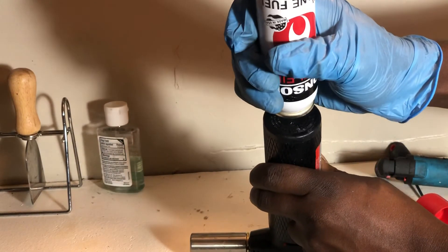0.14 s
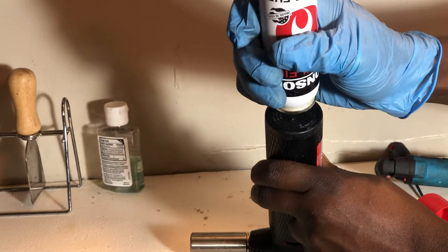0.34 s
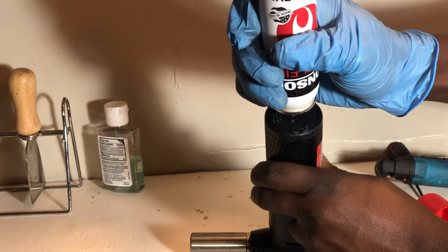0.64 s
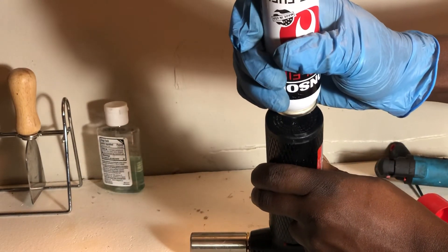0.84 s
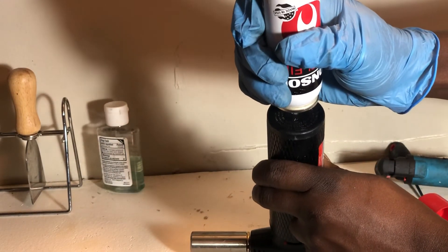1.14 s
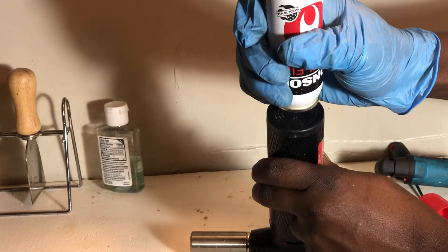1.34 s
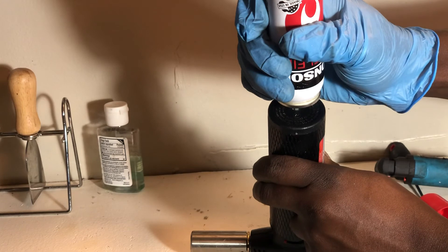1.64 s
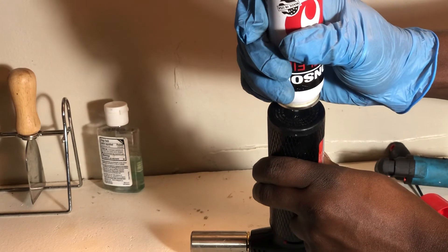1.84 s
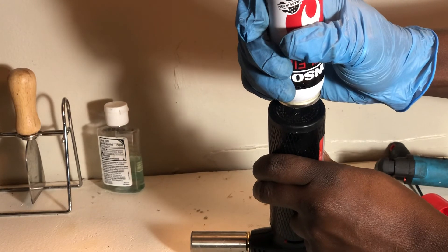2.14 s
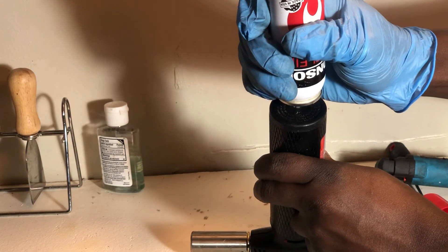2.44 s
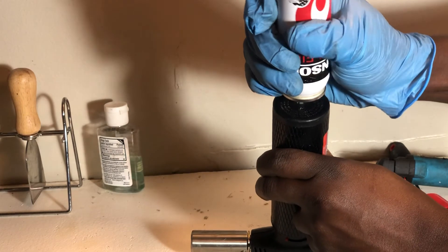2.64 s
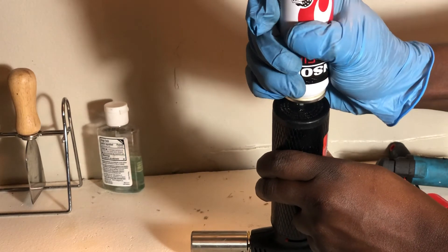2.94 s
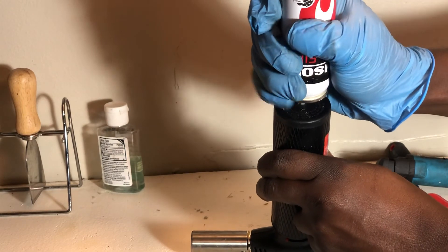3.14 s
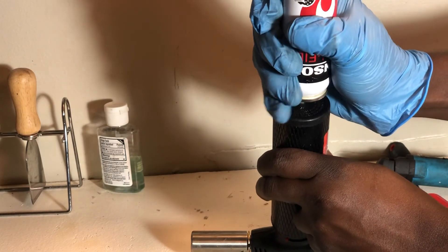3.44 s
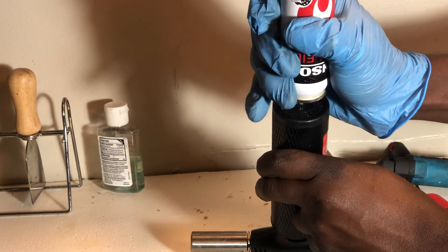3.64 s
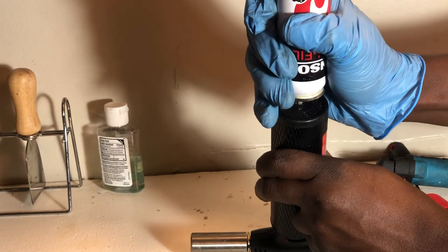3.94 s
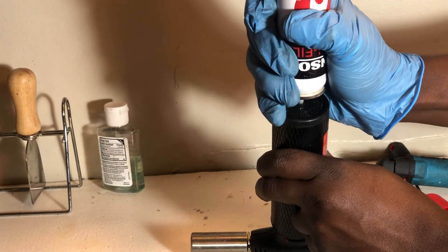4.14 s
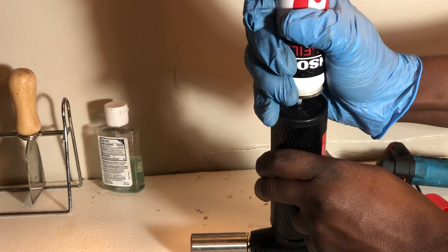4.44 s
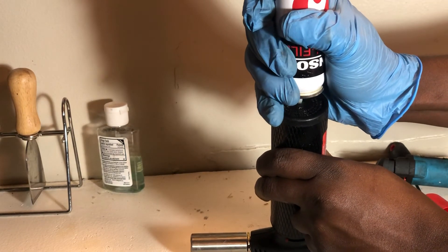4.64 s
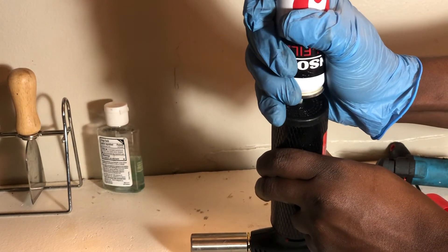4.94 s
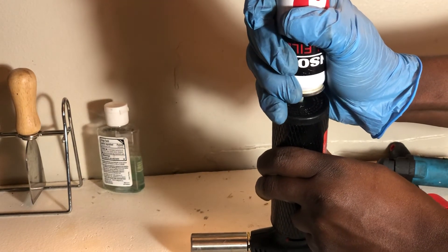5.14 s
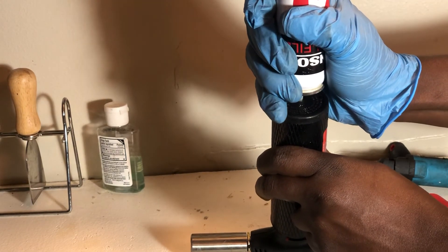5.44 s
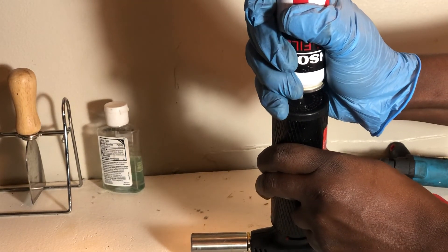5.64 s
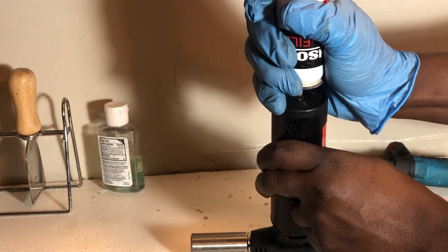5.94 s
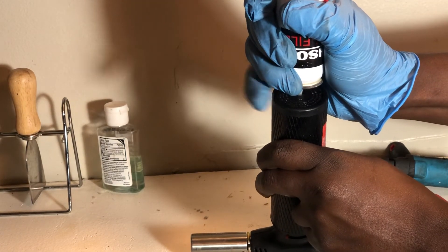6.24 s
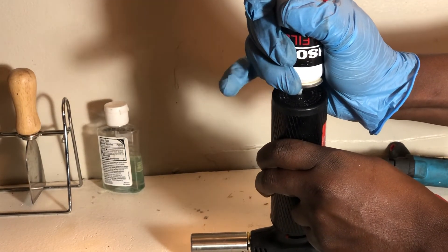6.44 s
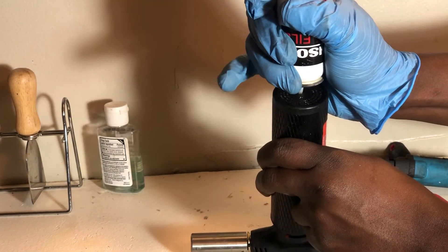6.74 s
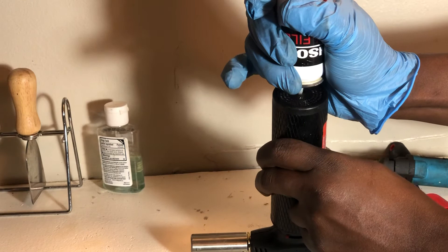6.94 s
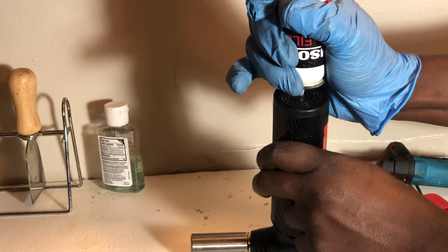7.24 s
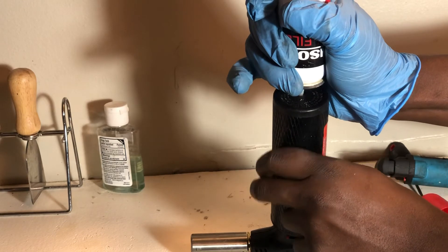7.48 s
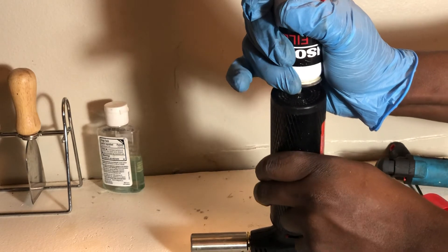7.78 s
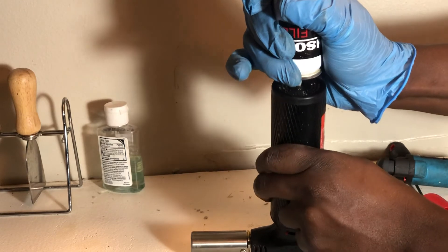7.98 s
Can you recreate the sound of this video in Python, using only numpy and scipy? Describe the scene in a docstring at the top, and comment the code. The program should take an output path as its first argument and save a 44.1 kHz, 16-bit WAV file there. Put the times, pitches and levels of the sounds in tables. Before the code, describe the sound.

A steady high-pitched gas hiss dominates, recorded near the hands with short reflections from bench and wall. It starts with quick liquid spurts and a small bump, becomes smooth and slightly stronger, then softens and shifts in colour as a finger covers the gap. Later it turns airier and uneven. Three tiny ticks occur, with quiet garage rumble and hum beneath, and soft low thuds near the end.

```python
"""In a garage, butane hisses from a can held nozzle-down on a torch's fill valve, over low room noise and hum.
First the leak, a fluttering noise jet, spurts liquid through the gap between can and torch; the valve recess
rings wet, then dries. The can rocks and leans, moving the gap's cut-on and the resonances that ride on it.
From about 3 s a gloved finger cups the joint, and a quieter hiss follows; after 6 s the finger eases partly off.
The nozzle ticks in its seat early, midway and late; hands bump the bench once early, then softly at the end."""
import sys
import numpy as np
from scipy import signal
from scipy.fft import rfft, irfft, next_fast_len
from scipy.io import wavfile
from scipy.ndimage import uniform_filter1d

SR = 44100
rng = np.random.default_rng(int(sys.argv[2]) if len(sys.argv) > 2 else 0)


def log_audio(samples):
    """Write samples as a 16-bit WAV file to the path given in sys.argv[1]."""
    # one column per channel
    frames = np.atleast_2d(samples).T
    # limit to full scale, then quantise
    limited = np.clip(frames, -1, 1)
    pcm = np.round(limited * 32767).astype(np.int16)
    wavfile.write(sys.argv[1], SR, pcm)


N = 357651

# The garage's noise spectrum. Each row: frequency in Hz, relative level in dB per Hz.
ROOM_SPECTRUM = [(20, -24), (35, -14), (56, 1.5), (75, -5.5), (105, 2.5), (135, -2), (175, -6), (240, -6),
                 (330, -7.5), (450, -9.5), (720, -9), (950, -5.5), (1400, -12), (3000, -23)]
# Narrow low resonances standing out of it. Each row: centre in Hz, width in Hz, level over the spectrum in dB.
ROOM_MODES = [(98.5, 6.9, -5.5), (131, 8, -2.5), (168, 12, 4.5), (285, 13, 0), (304, 11, -5), (525, 14, -1),
              (575, 7.9, 6), (939, 9.9, 3), (996, 5.5, 2)]
# Room level before the rumble swells; rumble top in Hz, and its resting gain in dB.
ROOM_DB, RUMBLE_TOP_HZ, RUMBLE_DB = -53, 330, -.3
# The grip shifts and the rumble swells. Each row: middle in seconds, length in seconds, gain in dB.
GRIP_SHIFTS = [(.08, 0.28, 4.5), (1.377, .2, 5), (4.176, 0.17, 4), (5.752, 0.57, 3), (6.9, 0.56, 2.5),
               (7.675, 0.29, 4), (8.06, 0.14, 9)]

# Lines of the low hum. Each row: centre in Hz, width in Hz, relative level in dB.
HUM_LINES = [(335.6, 6.1, -10.5), (358, 4.5, 1.5), (373.5, 3.2, -6.5)]
# The hum swells twice. Each row: middle in seconds, length in seconds, gain in dB.
HUM_SWELLS = [(2.45, 0.92, 6), (3.85, 0.57, 6)]
HUM_DB = -64  # between the swells

# Soft bumps of the hands on the bench. Each row: time in seconds, level in dB.
BUMPS = [(0.083, -39.5), (7.571, -48), (7.693, -49), (7.73, -49), (7.843, -41), (7.86, -41), (8.018, -36),
         (8.033, -45), (8.083, -41), (8.097, -42)]
# Low modes of the bench. Each row: frequency in Hz, level added to each bump in dB, 60 dB decay in seconds.
BENCH_MODES = [(61, 6.5, 0.05), (91, 2, 0.071), (139, -5.5, 0.17), (202, 1, 0.044), (294, -6.5, 0.043)]

# Echoes off torch, hands, bench and wall, some 0.5 to 1.7 m of extra path.
# Each row: delay in milliseconds, pressure gain.
ECHOES = [(1.565, .05), (1.995, -.08), (5.034, -.11)]

# The nozzle ticks in its seat. Each row: time in seconds, level in dB before the tick's filter.
TICKS = [(0.17, -36.5), (2.6202, -37), (7.243, -44)]

# Strength of the leak. Each row: time in seconds, hiss level in dB before the spurts.
FLOW = [(0, -35.5), (.6, -36), (1.24, -34), (1.48, -33), (1.72, -34.5), (2.7, -33.5), (3.16, -34),
        (3.48, -35), (4.09, -35.5), (4.3, -38), (4.7, -38), (5.15, -37.5), (6.1, -37.5), (6.38, -35),
        (6.85, -36), (7.05, -37.5), (7.4, -36.5), (7.9, -37), (8.04, -33.5)]
# Spurts of liquid in the jet.
# Each row: middle in seconds, length in seconds, gain in dB, dB added to the valve recess over twice that length.
SPURTS = [(.047, .018, 1.5, -1), (0.068, 0.013, 5, -2), (0.139, 0.041, 2.5, -1), (0.163, 0.052, 3, 0.5),
          (0.37, 0.0071, 3, 4.5), (0.412, 0.011, 7.5, -3), (0.604, 0.014, 5, 0.5), (0.68, 0.0082, 6.5, 5),
          (0.775, 0.011, 5, 2), (2.682, 0.064, 2.5, 0.5), (6.67, 0.079, 1.5, 0)]

# The gap passes treble only above its cut-on, which glides as the can rocks.
# Each row: time in seconds, cut-on in Hz.
CUT_ON = [(0, 7720), (.66, 7650), (.99, 7810), (2.07, 8010), (2.67, 7850), (2.96, 7800), (3.41, 7330),
          (3.6, 7580), (4.12, 7360), (4.73, 6780), (6.12, 6720), (6.39, 6950), (6.98, 7700), (7.34, 7020),
          (7.87, 6810), (7.96, 7370), (8.11, 7980)]
CUT_ON_STEEPNESS = 200  # exponent of the power slope below the cut-on
# Lean of the can off its seat, growing overall. Each row: time in seconds, lean from 0 to 1.
LEAN = [(0, 0.05), (2.26, 0.05), (3.33, 0.47), (6.15, 0.74), (6.86, 0.62), (7.13, 1), (8.11, 1)]
# A finger cups the joint. Each row: time in seconds, cover from 0 to 1.
FINGER = [(2.88, 0), (3.2, .49), (3.95, 0.55), (4.68, 0.85), (6.12, 0.73), (6.42, 0.37), (7.1, 0.24)]
# Resonances of the gap. Each row: multiple of the cut-on, width in Hz, level in dB, dB added at full lean,
# dB added at full finger cover, share of pitch gained at full lean, share of pitch gained at full cover.
GAP_RESONANCES = [(1.079, 655, -0.67, -4.5, .7, 0.018, 0.058), (1.24, 580, -4.9, 9.5, 4, 0.036, 0.081),
                  (1.53, 1890, -2, 0.9, -3, 0.015, 0), (2.04, 3070, -15, 9, -1.8, 0.03, .08)]
# Paths round the nozzle mostly add when the can is upright and cancel as it leans.
# Each row: multiple of the cut-on, width in Hz, dB when upright, dB at full lean.
INTERFERENCE = [(.56, 905, 3, -9), (.94, 450, -1.5, -3), (1.18, 520, 6.5, -3.5), (1.335, 600, 6, -11),
                (1.68, 600, 0, -0.5)]
# Airy whistles catch at the gap's edge and let go.
# Each row: start in seconds, end in seconds, centre in Hz, width in Hz, level in dB.
WHISTLES = [(-.2, 0.834, 15700, 250, -1), (2.56, 2.94, 12900, 950, -5), (2.59, 4.19, 10200, 700, -1),
            (3.47, 3.78, 12900, 1400, -16), (4.35, 5.85, 14110, 370, -4.5), (6.25, 6.773, 10980, 790, 1.5),
            (6.32, 6.76, 15070, 730, -7), (7.938, 8.3, 11800, 960, 2.5)]
# The treble band dulled by the finger, with its dB at full cover.
SHADE_HZ, SHADE_WIDTH_HZ, SHADE_DB = 13100, 1000, -3

# Rim and broad rush below the cut-on: level in dB, dB added at full lean, dB added at full finger cover.
RIM_DB = (-13, 1, -11.5)
RUSH_DB = (-24.5, 7, 3)
# Rim pitch as a multiple of the cut-on, share of pitch lost at full lean, width in Hz.
RIM_OVER_CUT_ON, RIM_SINK_SHARE, RIM_WIDTH_HZ = .81, 0.078, 980
# The valve recess rings louder and lower while liquid wets it; it dries over the last DRYING_S.
WET_UNTIL_S, DRYING_S = 0.92, 0.3
RECESS_DRY_HZ, RECESS_WET_HZ, RECESS_WIDTH_HZ = 3530, 3270, 780
RECESS_DB, RECESS_WET_DB, RECESS_LEAN_DB = -16.5, 5.5, -7  # dry level, added when wet, added at full lean
# Resonances of the hollow under the finger. Each row: centre in Hz, width in Hz, relative level in dB.
HOLLOW = [(1820, 150, -2), (2250, 210, -8), (4300, 370, -3.5), (4770, 210, -1.5)]
HOLLOW_DB, HOLLOW_CUPPED_DB = -22.5, 13  # when open, added at full cover
# Narrow resonances of can and valve. Each row: centre in Hz, width in Hz, relative level in dB.
METAL = [(2890, 90, 0), (3273, 220, -3), (3704, 100, 0), (3854, 80, -1), (5254, 180, -3), (8665, 100, 0),
         (8829, 90, -4), (9216, 80, -5), (9475, 150, -4), (9706, 70, -1), (9860, 120, -3), (10250, 150, -2),
         (10635, 70, 1), (10810, 120, -1), (10982, 50, 0), (11197, 100, -3), (11640, 110, -1),
         (12240, 180, 0), (12457, 70, -2), (12640, 140, -2), (13015, 60, -2), (13221, 150, -4),
         (13430, 70, -3)]
METAL_DB = 0.64  # over the sound passing through

CUTOFF_HZ = 15740


def from_db(db):
    """Decibels to pressure gain."""
    return 10 ** (np.asarray(db) / 20)


def power_of(db):
    """Decibels to power."""
    return from_db(db) ** 2


def rms_one(x):
    """Scale to an rms of one."""
    return x / np.sqrt(np.mean(x ** 2) + 1e-20)


def in_time(rows, t):
    """The columns of a curve at times t."""
    s, *columns = np.transpose(rows)
    return [np.interp(t, s, column) for column in columns]


def coloured(x, gain):
    """Filter x by a gain given as a function of frequency."""
    size = next_fast_len(N + SR // 2)
    hz = np.arange(size // 2 + 1) * SR / size + 1e-6
    return irfft(rfft(x, size) * gain(hz), size)[:N]


def drift(rate_hz):
    """Slow random wander with a spread of one."""
    return rms_one(coloured(rng.standard_normal(N), lambda hz: 1 / (1 + (hz / rate_hz) ** 2)))


def resonance(hz, centre_hz, width_hz):
    """Power response of one resonance, with a peak of one."""
    return 1 / (1 + 2 * ((hz - centre_hz) / width_hz) ** 2) ** 2


def modes(hz, table):
    """Power response of several resonances side by side."""
    return sum(power_of(db) * resonance(hz, centre, width) for centre, width, db in table)


def flat_swell(t, middle, length):
    """A flat-topped swell of height one."""
    return np.exp(-(2 * (t - middle) / length) ** 4)


def swells(t, rows):
    """Decibels added by a table of swells."""
    return sum(gain_db * flat_swell(t, middle, length) for middle, length, gain_db, *_ in rows)


def room_noise(t):
    """The rush of the garage, with a rumble at the bottom that swells when the grip shifts."""
    points_hz, points_db = np.transpose(ROOM_SPECTRUM)

    def spectrum(hz):
        smooth_db = np.interp(np.log(hz), np.log(points_hz), points_db)
        return from_db(smooth_db) * np.sqrt(1 + modes(hz, ROOM_MODES))

    noise = from_db(ROOM_DB) * rms_one(coloured(rng.standard_normal(N), spectrum))
    rumble = coloured(noise, lambda hz: 1 / (1 + (hz / RUMBLE_TOP_HZ) ** 6))
    return noise - rumble + rumble * from_db(RUMBLE_DB + swells(t, GRIP_SHIFTS))


def hum(t):
    """A few close, narrow noise lines beat together, their level evened out over an eighth of a second."""
    lines = coloured(rng.standard_normal(N), lambda hz: np.sqrt(modes(hz, HUM_LINES)))
    steady = lines / np.sqrt(uniform_filter1d(lines ** 2, size=SR // 8) + 1e-18)
    return steady * from_db(HUM_DB + swells(t, HUM_SWELLS))


def bumps():
    """Each bump sets the low modes of the bench ringing, a little unevenly."""
    out = np.zeros(N)
    s, bump_db = np.transpose(BUMPS)
    at = np.minimum(s * SR, N - 1).astype(int)
    for k, (hz, mode_db, t60) in enumerate(BENCH_MODES):
        pushes = np.zeros(N)
        uneven_db = rng.normal(0, 2, len(s))
        pushes[at] = from_db(bump_db + mode_db + uneven_db)
        # a two-pole resonator: decay per sample and angle per sample
        r, w = from_db(-60 / (t60 * SR)), 2 * np.pi * hz / SR
        ringing = signal.lfilter([0, np.sin(w)], [1, -2 * r * np.cos(w), r * r], pushes + 1e-18)
        out += (-1) ** k * ringing  # neighbouring modes in opposite polarity
    return signal.sosfilt(signal.butter(2, 45, "high", fs=SR, output="sos"), out)


def reflections(x, scatter_db, scatter_s, count=7):
    """Near echoes ripple the spectrum; scatter off the moving hands blends from one pattern to the next."""
    t = np.arange(SR // 20) / SR
    pose = np.linspace(0, count - 1, N)

    def direct_and_echoes(hz):
        return 1 + sum(gain * np.exp(-2j * np.pi * hz * ms / 1000) for ms, gain in ECHOES)

    out = coloured(x, direct_and_echoes)
    for k in range(count):
        scatter = rng.standard_normal(len(t)) * np.exp(-t / scatter_s) * (t > .002)
        scatter *= from_db(scatter_db) / np.linalg.norm(scatter)
        blend = np.sqrt(np.clip(1 - np.abs(pose - k), 0, 1))  # equal-power crossfade
        out = out + blend * signal.oaconvolve(x, scatter)[:N]
    return out / np.sqrt(1 + power_of(scatter_db))


def ticks(t, decay_s, dull_hz, thin_hz):
    """Each slip of the nozzle is a short, thin crack of noise."""
    envelope = sum(from_db(db) * (t >= s) * np.exp(-np.abs(t - s) / decay_s) for s, db in TICKS)

    def crack(hz):
        low_pass = 1 / (1 + 1j * hz / dull_hz)
        high_pass = 1 / (1 - 1j * thin_hz / hz)
        return 2 * low_pass * high_pass

    return coloured(envelope * rng.standard_normal(N), crack)


def grip(t):
    """How the can is held at times t: cut-on in Hz, lean and finger cover."""
    cut_on, lean, finger = (in_time(rows, t)[0] for rows in (CUT_ON, LEAN, FINGER))
    return cut_on, np.clip(lean, 0, 1), np.clip(finger, 0, 1)


def held(t, level_db, lean_db, finger_db):
    """Power of one outlet as lean and finger open or shade it."""
    _, lean, finger = grip(t)
    return power_of(level_db + lean_db * lean + finger_db * finger)


def rim(hz, t):
    """Power of the rim's resonance under the cut-on; it sinks faster the further the can leans."""
    cut_on, lean, _ = grip(t)
    centre = RIM_OVER_CUT_ON * cut_on * (1 - RIM_SINK_SHARE * lean ** 2)
    return held(t, *RIM_DB) * resonance(hz, centre, RIM_WIDTH_HZ)


def recess(hz, t):
    """Power of the valve recess, louder and lower while wet and shifted in level by the spurts."""
    wet = np.clip((WET_UNTIL_S - t) / DRYING_S, 0, 1)
    spurts_db = sum(extra_db * flat_swell(t, s, 2 * length) for s, length, _, extra_db in SPURTS)
    level = held(t, RECESS_DB + RECESS_WET_DB * wet + spurts_db, RECESS_LEAN_DB, 0)
    centre = RECESS_DRY_HZ + (RECESS_WET_HZ - RECESS_DRY_HZ) * wet
    return level * resonance(hz, centre, RECESS_WIDTH_HZ)


def shade(hz, t):
    """Power left by the covering finger, which dulls one band of the treble."""
    return power_of(SHADE_DB * grip(t)[2] * resonance(hz, SHADE_HZ, SHADE_WIDTH_HZ))


def whistles(hz, t, fade_s=0.077):
    """Power of the airy bands that come and go at the gap's edge."""
    power = 0
    for start, end, centre, width, db in WHISTLES:
        fade = np.clip(np.minimum(t - start, end - t) / fade_s, 0, 1)
        power = power + fade * power_of(db) * resonance(hz, centre, width)
    return power


def interference(hz, t):
    """Power of the crests and dips, from paths round the nozzle, that glide with the cut-on."""
    cut_on, lean, _ = grip(t)
    ripple_db = 0
    for ratio, width, upright_db, leaning_db in INTERFERENCE:
        depth_db = upright_db + (leaning_db - upright_db) * lean
        ripple_db = ripple_db + depth_db * resonance(hz, ratio * cut_on, width)
    return power_of(ripple_db)


def gap_treble(hz, t, flicker_db=0.76, flicker_hz=9):
    """Power above the cut-on: four resonances ride on it, each flickering on its own."""
    cut_on, lean, finger = grip(t)
    peaks = 0
    for ratio, width, level_db, lean_db, finger_db, lean_shift, finger_shift in GAP_RESONANCES:
        centre = ratio * cut_on * (1 + lean_shift * lean + finger_shift * finger)
        flicker = power_of(flicker_db * np.interp(t * SR, np.arange(N), drift(flicker_hz)))
        peaks = peaks + flicker * held(t, level_db, lean_db, finger_db) * resonance(hz, centre, width)
    passed = (1 + np.tanh(CUT_ON_STEEPNESS / 2 * np.log(hz / cut_on))) / 2
    return peaks * passed


def gap(source, rush_slope, rush_low_hz, window=1024):
    """The gap, valve recess, finger and metal colour the jet frame by frame, keeping its treble power."""
    overlap = window - window // 4
    hz, t, frames = signal.stft(source, SR, nperseg=window, noverlap=overlap)
    hz = hz[:, None] + 1  # clear of zero
    ripple = interference(hz, t)
    treble = gap_treble(hz, t) * ripple * shade(hz, t) + whistles(hz, t)
    rush = held(t, *RUSH_DB) * (hz / 1700) ** -rush_slope / (1 + (rush_low_hz / hz) ** 4)
    hollow = held(t, HOLLOW_DB, 0, HOLLOW_CUPPED_DB) * modes(hz, HOLLOW)
    metal = 1 + power_of(METAL_DB) * modes(hz, METAL)
    outlets = treble + recess(hz, t) + (rim(hz, t) + rush) * ripple + hollow
    power = outlets * metal / np.mean(treble * metal, axis=0)
    return signal.istft(frames * np.sqrt(power), SR, nperseg=window, noverlap=overlap)[1][:N]


def jet(t, wander_db, flutter_db, sputter_db, spits_per_s, spit_db):
    """Turbulent noise that flutters and sputters, with tiny droplets bursting in it."""
    bursts = 1.0 * (rng.random(N) < spits_per_s / SR)
    droplets = uniform_filter1d(bursts, size=SR // 3000) > 1e-6  # each lasts a third of a millisecond
    unsteady_db = wander_db * drift(6.6) + flutter_db * drift(18) + sputter_db * drift(450)
    unsteady_db = unsteady_db + spit_db * droplets
    turbulence = rms_one(rng.standard_normal(N) * from_db(unsteady_db))
    return turbulence * from_db(in_time(FLOW, t)[0] + swells(t, SPURTS))


def scene():
    """Hiss and ticks with near reflections, over bumps, hum and room; alike in both channels."""
    t = np.arange(N) / SR
    leak = jet(t, wander_db=0.47, flutter_db=0.37, sputter_db=0.44, spits_per_s=320, spit_db=0.5)
    hiss = gap(leak, rush_slope=0.78, rush_low_hz=1410)
    cracks = ticks(t, decay_s=0.0054, dull_hz=5000, thin_hz=600)
    near = reflections(hiss + cracks, scatter_db=-8, scatter_s=0.014)
    sound = near + bumps() + hum(t) + room_noise(t)
    return np.array([sound, sound])


def record(dry):
    """The top is cut steeply, by a low-pass run forwards and backwards."""
    low_pass = signal.ellip(12, .05, 60, CUTOFF_HZ, fs=SR, output="sos")
    return signal.sosfiltfilt(low_pass, dry)


dry = scene()
out = record(dry)
log_audio(out)
```